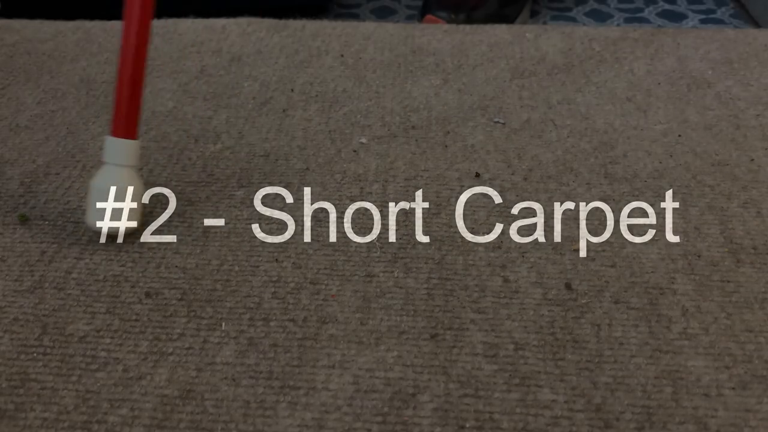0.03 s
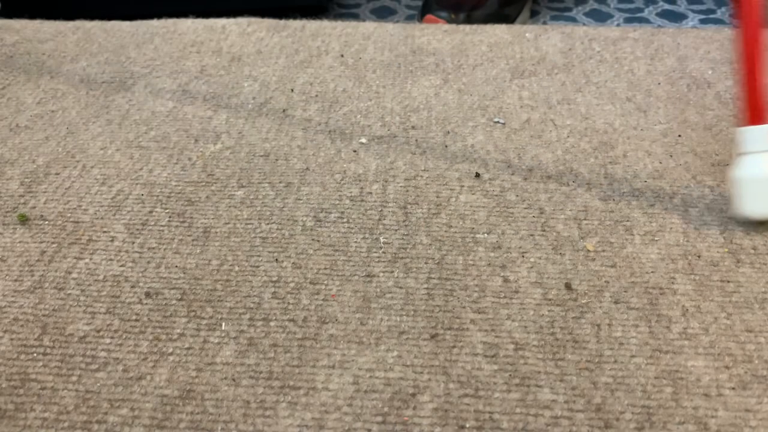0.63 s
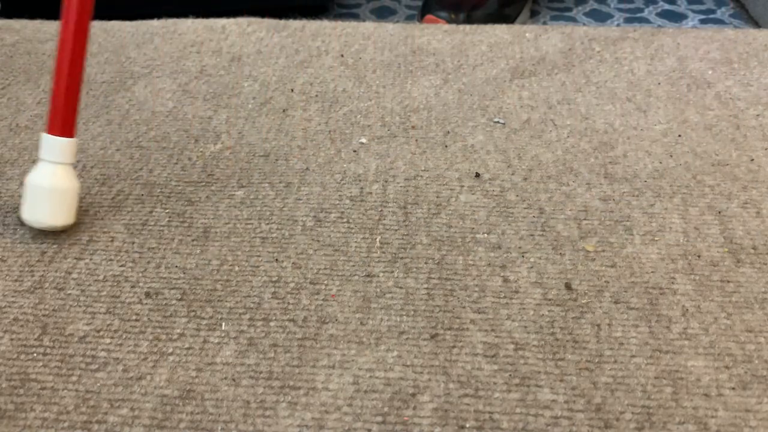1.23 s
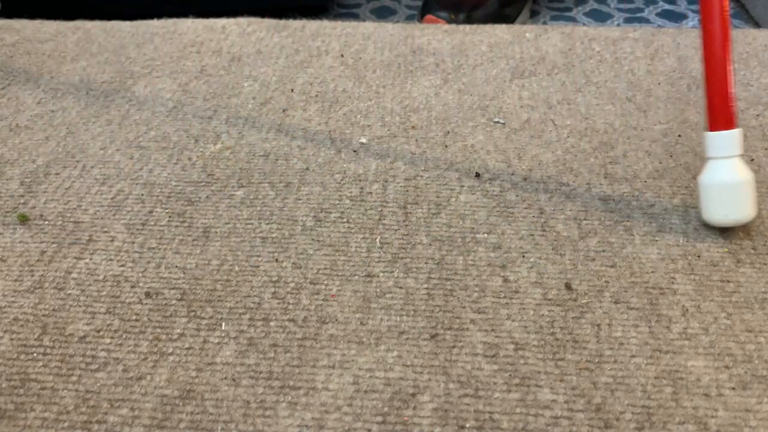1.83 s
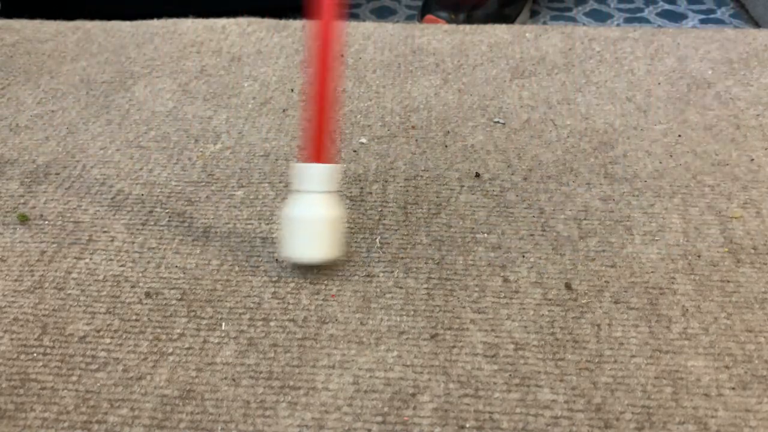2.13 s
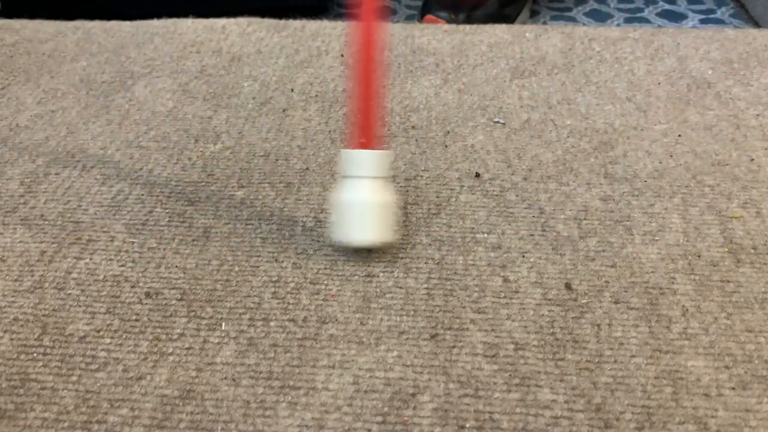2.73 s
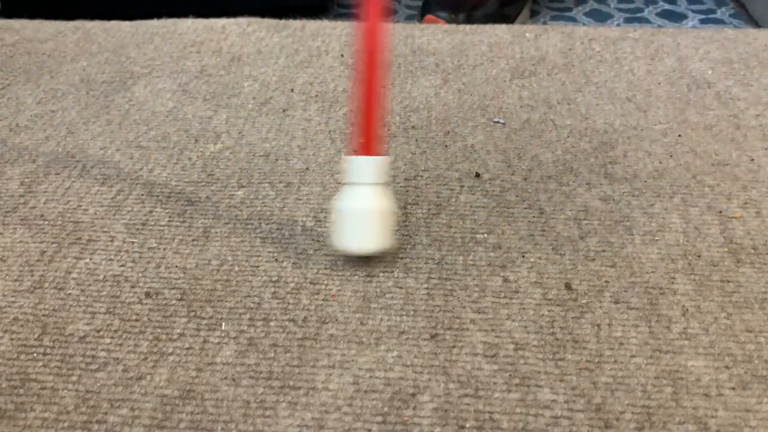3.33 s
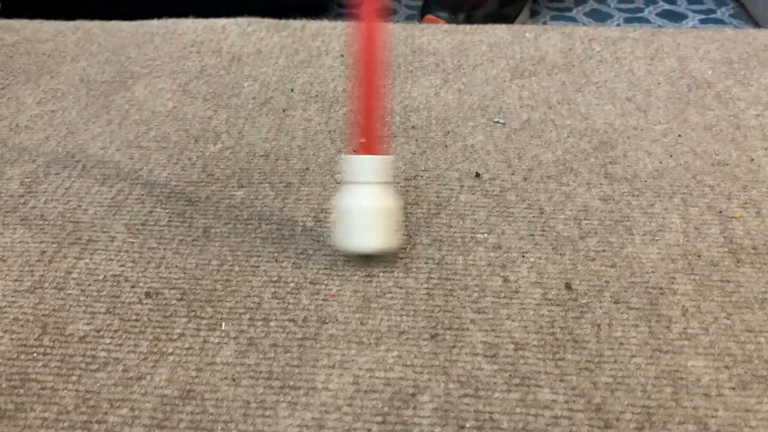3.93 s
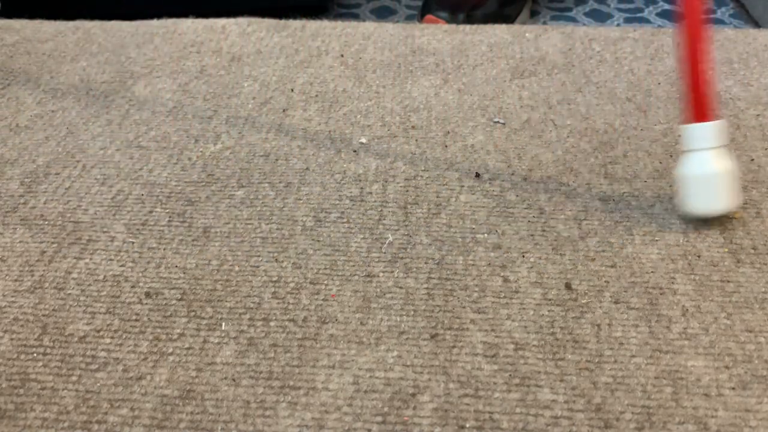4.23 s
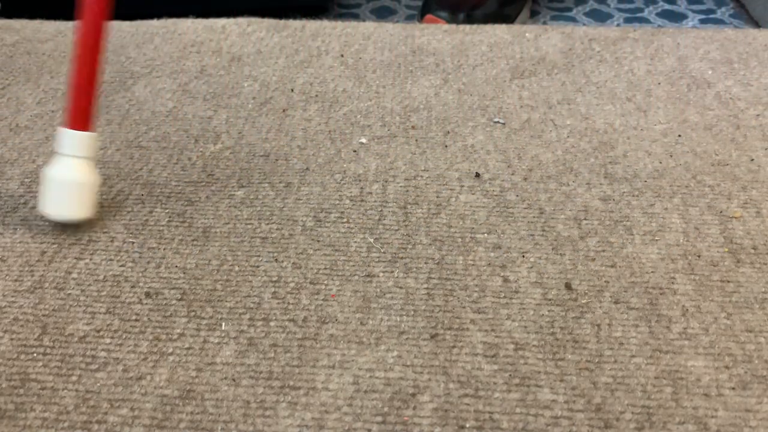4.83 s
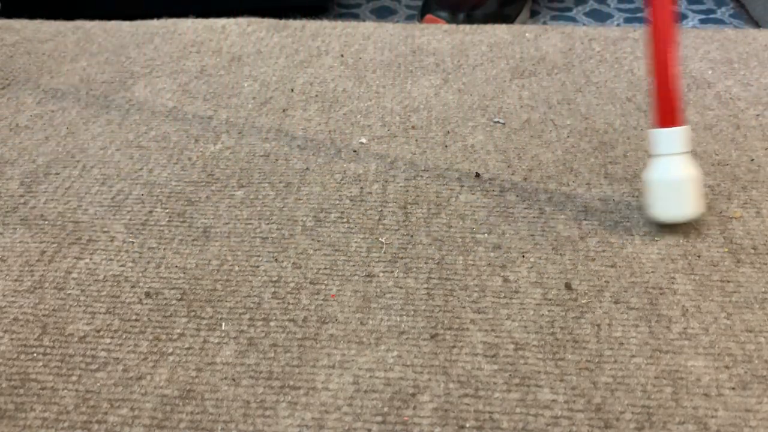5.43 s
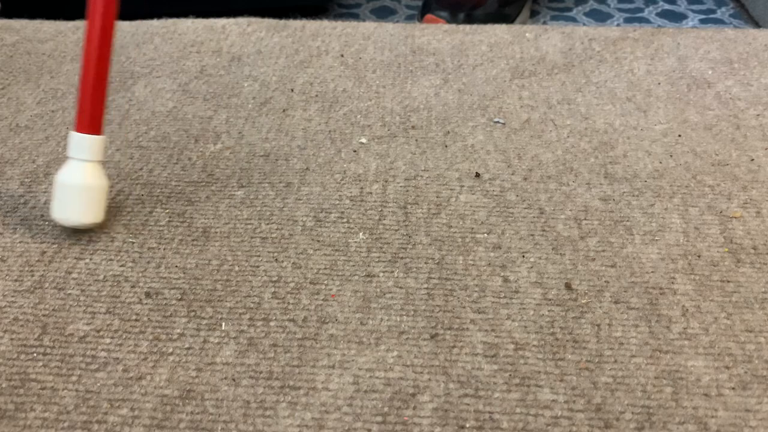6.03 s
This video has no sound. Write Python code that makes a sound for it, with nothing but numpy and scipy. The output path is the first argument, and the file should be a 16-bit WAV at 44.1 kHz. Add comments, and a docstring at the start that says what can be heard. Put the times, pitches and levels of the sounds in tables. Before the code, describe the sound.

A long cane's plastic tip sweeps over short ribbed carpet for six seconds, close to one microphone. There are ten dry, grainy swishes, with brief dips at the turns near 0.5, 1.2, 1.8, 2.4, 3.0, 3.6, 4.3, 4.9 and 5.5 seconds. They alternate: one starts hard and eases off, the next begins softer and builds until it stops. The rubbing carries a slight plastic ring and a hollow tone from the shaft. In the middle of most strokes the ribs add a short low drumming, strongest around 2.1, 2.7 and 3.9 seconds. Tiny bright rasps are scattered throughout as the tip snags on tufts. The loose tip knocks lightly at 0.3 seconds, rattles briefly around 2.4, and knocks again near 3.7, 4.1, 4.3 and 5.1. The room is small and furnished, with a short, soft tail, a steady low rumble and faint hiss.

```python
"""The plastic tip of a long cane sweeps left and right over short ribbed carpet, close to one microphone.
Fibres catch and slip under the tip and ring the cane; in mid-stroke the ribs make it drum.
The tip snags on tufts and knocks now and then, mostly near the turns.
The room is small and furnished, with a short, soft tail and a low rumble under everything."""
import sys
import numpy as np
from scipy import signal
from scipy.fft import rfft, irfft, next_fast_len
from scipy.io import wavfile
from scipy.ndimage import uniform_filter1d, map_coordinates

SR = 44100
rng = np.random.default_rng(int(sys.argv[2]) if len(sys.argv) > 2 else 0)


def digitize_waveform(pressure):
    """Quantize a signal to 16-bit integers and store it at the path in sys.argv[1].

    Rows of a 2-D input are taken as channels; values are limited to [-1, 1].
    """
    field = np.atleast_2d(pressure).T
    bounded = np.clip(field, -1, 1)
    quanta = np.round(bounded * 32767).astype(np.int16)
    wavfile.write(sys.argv[1], SR, quanta)


N = 269010

# Friction spectrum at the left of the arc. Each row: frequency in Hz, level in dB.
LEFT_FRICTION = [(400, -7), (780, -16), (1080, 0), (1400, -1.5), (1800, 0), (2300, -1), (2750, -4),
                 (4200, -7.5), (6500, -7.5), (7650, -16), (9200, -14.5), (10400, -19), (12000, -22.5),
                 (15000, -34)]
# Resonances of the plastic tip. Each row: frequency in Hz, width in Hz, level in dB.
TIP_MODES = [(1529, 28, 7.5), (1670, 21, -5.5), (1905, 81, -8.5), (2120, 130, -13), (4980, 190, -14),
             (7140, 290, -6), (8460, 160, 5.5)]
# Bending modes of the hollow shaft. Each row: frequency in Hz, width in Hz, level in dB.
SHAFT_MODES = [(361, 64, 3.5), (458.6, 60, 5), (568, 24, -7), (620, 41, -7), (873, 36, -17.5)]


def amp(db):
    return 10 ** (np.asarray(db) / 20)


def unit(x):
    return x / np.sqrt(np.mean(x ** 2) + 1e-20)


def along(points, hz):
    """Interpolate (Hz, value) points on a log frequency axis."""
    f, v = np.transpose(points)
    return np.interp(np.log(hz + 1), np.log(f + 1), v)


def wobble(rate):
    """A smooth random curve, rate knots a second."""
    return map_coordinates(rng.standard_normal(N // 20), [np.arange(N) * rate / SR], mode="wrap")


def filtered(x, response):
    """Pass x through a complex frequency response."""
    size = next_fast_len(N + SR // 2)
    return irfft(rfft(x, size) * response(np.fft.rfftfreq(size, 1 / SR)), size)[:N]


def noise(response):
    """Coloured noise at unit RMS."""
    return unit(filtered(rng.standard_normal(N), response))


def ring(modes, hz):
    """Response of a set of resonances."""
    return sum(amp(db) * 1j * hz * width / (centre ** 2 - hz ** 2 + 1j * hz * width)
               for centre, width, db in modes)


def above(edge_hz, hz):
    return np.sqrt(1 - below(edge_hz, hz) ** 2)


def below(edge_hz, hz):
    return 1 / np.sqrt(1 + (hz / edge_hz) ** 8)


def bursts(rows, rise_s):
    """An envelope that rises at every (s, dB, t60 s) event and dies away."""
    t, envelope = np.arange(SR // 4) / SR, np.zeros(N + SR)
    for start, db, t60 in rows:
        envelope[round(start * SR):][:len(t)] += amp(db - 60 * t / t60)
    return uniform_filter1d(envelope, max(1, round(rise_s * SR)))[:N]


def tip_motion():
    """Going right the rub starts hard and eases off; going left it builds until the tip stops."""
    # Strokes alternate, the first to the right. Each row: start, length and rise in seconds,
    # scrape level at start and end in dB, hiss and shaft offsets from the scrape in dB.
    strokes = [(-.03, 0.54, 0.12, -50.5, -67.5, -1, 0.5), (.48, 0.69, 0.082, -62.5, -57, 0, 0),
               (1.15, 0.63, 0.14, -53.5, -64, -1.5, 0), (1.765, 0.61, 0.064, -64, -58, 0.5, 2),
               (2.38, 0.6, 0.19, -49.5, -67.5, -0.5, 0), (2.97, 0.56, 0.063, -64.5, -57.5, 1, 1.5),
               (3.665, 0.67, .12, -52, -72, 0, 0), (4.295, 0.558, 0.071, -62.5, -59, 1, 0.5),
               (4.935, 0.53, 0.13, -54, -65.5, -0.5, -0.5), (5.50, 0.53, 0.16, -62.5, -58.5, 0.5, 3)]
    brake_s, bite_db = .04, 2
    t = np.arange(N) / SR
    state = np.zeros((5, N))
    for k, (start, length, rise, first_db, last_db, hiss_db, shaft_db) in enumerate(strokes):
        progress = np.clip((t - start) / length, 0, 1)
        place = (1 - (-1) ** k * np.cos(np.pi * progress)) / 2
        speed = np.clip((t - start) / rise, 0, 1) ** 1.16
        speed *= np.clip((start + length - t) / brake_s, 0, 1) ** 1.4
        db = first_db + (last_db - first_db) * progress + np.sin(np.pi * progress)  # 1 dB up mid-stroke
        bite = bite_db * (k % 2) * progress ** 4  # a leftward stroke presses into its stop
        takes_over = (k == 0) | ((t >= start) & (speed >= state[1]))
        state = np.where(takes_over, [place, speed, db, db + hiss_db + bite, db + shaft_db], state)
    return state


def rubbing():
    """The tip's motion sets the colour (0 left, 1 right) and the dB of scrape, hiss and shaft."""
    place, speed, scrape_db, hiss_db, shaft_db = tip_motion()
    left_turn, right_turn = 0.035, 0.96
    side = right_turn + (left_turn - right_turn) * (1 - place) ** 2.38  # the left colour fades early

    def level(db, power, rest_db):
        """A lower power of speed sounds sooner; at rest the tip still shifts in the pile."""
        return 20 * np.log10(np.hypot(amp(db) * speed ** power, amp(rest_db)))

    return (side, level(scrape_db, power=0.92, rest_db=-74.5),
            level(hiss_db - 3.5 * (1 - side), power=1.04, rest_db=-78),
            level(shaft_db - 3.5 * (1 - side) - 6.5 * side, power=0.54, rest_db=-73.5))


def slips(per_second, spread_db, smooth):
    """Tiny slips of single fibres, of uneven size, on the smooth rub of the pile."""
    happens = rng.random(N) < per_second / SR
    sizes = amp(spread_db * np.clip(rng.standard_normal(N), -2, 2)) * rng.choice([-1, 1], N)
    return unit(unit(happens * sizes) + smooth * rng.standard_normal(N))


def tube(x, t60, share):
    """The many close, weak modes of the cane add a very short ring to what excites them."""
    t = np.arange(SR // 20) / SR
    tail = amp(-60 * t / t60) * rng.standard_normal(len(t))
    return x + share * signal.fftconvolve(x, tail / np.linalg.norm(tail))[:N]


def friction_at(side):
    """Fibre friction at one place on the arc; the plastic rings most at the left."""
    # Friction spectrum at the right of the arc. Each row: frequency in Hz, level in dB.
    right_friction = [(400, -5), (720, 3.5), (860, 11), (1080, -3.5), (1400, -1), (1600, 0.5), (2200, 0.5),
                      (3200, 2), (4600, -3.5), (6400, -9), (7200, -7), (10300, -8), (12500, -26),
                      (15000, -32)]
    fibres = tube(slips(per_second=2200, spread_db=4.0, smooth=0.83), t60=0.025, share=0.7)
    colour = lambda hz: amp((1 - side) * along(LEFT_FRICTION, hz) + side * along(right_friction, hz))
    ringing = 1.02 * (1 - side) ** 0.59 + 0.033 * side
    return unit(filtered(fibres, lambda hz: colour(hz) * (1 + ringing * ring(TIP_MODES, hz))))


def sweep(side, scrape_db, hiss_db, zones=8):
    """Friction changes colour along the arc, and its top fades as the tip slows for a turn."""
    nearness = lambda zone: np.clip(1 - abs(side - zone) * (zones - 1), 0, 1)
    friction = sum(np.sqrt(nearness(zone)) * friction_at(zone) for zone in np.linspace(0, 1, zones))
    scrape = unit(filtered(friction, lambda hz: above(525, hz) * below(3250, hz)))
    hiss = unit(filtered(friction, lambda hz: 1j * above(3580, hz) * below(15600, hz)))
    top = filtered(hiss, lambda hz: above(6400, hz))
    top_db = .11 * np.minimum(hiss_db + 64.5, 0)  # hiss under -64.5 dB grows duller
    hiss += top * (amp(top_db) - 1)
    judder_db = 1.14 * wobble(55) + 0.52 * wobble(230)  # the tip hops over the weave
    scrape *= amp(scrape_db + judder_db + 0.97 * wobble(35))
    return scrape + amp(hiss_db + 0.82 * judder_db) * hiss


def hollow_shaft(shaft_db):
    """Coarser slips ring the hollow shaft."""
    coarse = slips(per_second=700, spread_db=5, smooth=0.41)
    hollow = filtered(coarse, lambda hz: ring(SHAFT_MODES, hz) * above(296, hz) * below(850, hz))
    return amp(shaft_db) * unit(hollow)


def room_tone():
    """Steady low rumble in the room, with a faint hiss."""
    # Each row: frequency in Hz, relative level in dB.
    spectrum = [(2, 2), (5, 10.5), (11, 11), (18, 9), (26, 0), (40, -1), (56, -4.5), (72, 0), (90, -5.5),
                (118, -5.5), (145, -14), (210, -19.5), (450, -35.5), (1100, -40.5), (3200, -45),
                (15000, -47)]
    return amp(-45) * noise(lambda hz: amp(along(spectrum, hz)))


def rib_drumming():
    """Once in most strokes the tip runs across the carpet's ribs and sets cane and floor drumming."""
    # Resonances of cane and floor. Each row: frequency in Hz, width in Hz, level in dB.
    drum_modes = [(94.4, 17, -5.5), (168.7, 22, -10)]
    # Bell-shaped swells. Each row: middle in seconds, standard deviation in seconds, level in dB.
    crossings = [(.24, 0.13, -48.5), (.69, 0.076, -47.5), (1.53, 0.13, -50.5), (2.085, .022, -43.5),
                 (2.74, .11, -45), (3.9, .06, -44), (4.51, 0.064, -47), (5.26, .07, -46),
                 (5.85, .12, -53.5)]
    ribs_per_second = 94 + 7 * wobble(35)
    phase = 2 * np.pi * np.cumsum(ribs_per_second) / SR
    ribs = np.sin(phase) + 0.023 * np.sin(2 * phase)
    thud = noise(lambda hz: ring(drum_modes, hz) * above(60, hz) * below(155, hz))
    t = np.arange(N) / SR
    swells = sum(amp(db) * np.exp(-.5 * ((t - middle) / width) ** 2) for middle, width, db in crossings)
    flutter_db = 1.5 * wobble(22.19)  # comes and goes as the tip rides the ribs
    return swells * amp(flutter_db) * unit(ribs + .5 * thud)


def snags():
    """The tip catches on a tuft: a short, bright rasp that shakes the shaft."""
    # Each row: start in seconds, level in dB, time to fall 60 dB in seconds.
    tufts = [(.085, -45.5, 0.044), (.125, -47, .05), (.177, -48, 0.03), (.276, -42, 0.024),
             (.316, -51.5, 0.056), (.822, -47.5, 0.031), (1.070, -47, .035), (1.915, -50, 0.048),
             (2.297, -51, 0.011), (2.341, -52.5, .04), (2.502, -44, 0.029), (2.594, -46, 0.072),
             (2.665, -48.5, 0.071), (2.772, -45.5, 0.042), (3.421, -47.5, .04), (3.488, -51.5, 0.041),
             (3.785, -48, 0.079), (4.055, -61, 0.028), (4.125, -54, 0.032), (4.263, -53, 0.022),
             (4.471, -53, 0.013), (4.701, -56, .035), (4.711, -45.5, 0.043), (4.785, -55, 0.066),
             (5.134, -46, 0.042), (5.277, -46.5, 0.02), (5.903, -46.5, 0.043)]
    colour = lambda hz: amp(along(LEFT_FRICTION, hz)) * (1 + .3 * ring(TIP_MODES, hz))
    rasp = noise(lambda hz: colour(hz) * above(700, hz) * below(12000, hz))
    shake = noise(lambda hz: ring(SHAFT_MODES, hz) * above(290, hz))
    return bursts(tufts, rise_s=0.0038) * (rasp + amp(-5.5) * shake)


def knocks():
    """The loose tip knocks on the shaft, which rings under a dry clack."""
    # Each row: start in seconds, strength in dB, clack offset from that strength in dB.
    hits = [(0.321, -41.5, -22), (2.342, -47.5, -2.5), (2.345, -41, -4), (2.393, -52, -1),
            (2.398, -41.5, -7), (2.407, -43, -12), (2.411, -49, -4.5), (2.420, -43.5, -23),
            (3.743, -46, -19.5), (4.125, -47, -7.5), (4.262, -53, -0.5), (5.138, -44, -13)]
    # Contact noise of a knock. Each row: frequency in Hz, relative level in dB.
    clack_spectrum = [(200, -10), (450, 10), (750, -1), (1300, 1), (2200, -4), (3500, -12), (8500, -17),
                      (13000, -30)]
    blows = np.zeros(N)
    for start, db, _ in hits:
        blows[round(start * SR)] = amp(db)
    ringing = amp(29) * filtered(blows, lambda hz: ring(SHAFT_MODES, hz))
    clack = noise(lambda hz: amp(along(clack_spectrum, hz)))
    envelope = bursts([(start, db + clack_db, .028) for start, db, clack_db in hits], rise_s=0.00056)
    return ringing + clack * envelope


def room_tail(x):
    """The furnished room's short, soft tail reaches the microphone 5 ms after the direct sound."""
    # Each row: frequency in Hz, time to fall 60 dB in seconds.
    decay = [(150, 0.69), (1500, 0.12), (10000, 0.078)]
    hz, t, spectra = signal.stft(rng.standard_normal(SR // 2), SR, nperseg=256)
    _, tail = signal.istft(spectra * amp(-60 * t / along(decay, hz)[:, None]), SR, nperseg=256)
    return signal.fftconvolve(x, np.pad(tail / np.linalg.norm(tail), (SR // 200, 0)))[:N]


def scene():
    """The cane close up, in mono, with the room's tail well under it."""
    side, scrape_db, hiss_db, shaft_db = rubbing()
    cane = sweep(side, scrape_db, hiss_db) + hollow_shaft(shaft_db) + rib_drumming() + snags() + knocks()
    return (cane + amp(-16) * room_tail(cane) + room_tone())[None]


def record(dry):
    """The microphone channel opens after a moment of silence and passes nothing above its band limit."""
    silence_s, fade_s, top_hz = .02, .003, 15720
    opening = np.clip((np.arange(N) / SR - silence_s) / fade_s, 0, 1)
    return filtered(dry[0] * opening, lambda hz: hz < top_hz)[None]


dry = scene()
out = record(dry)
digitize_waveform(out)
```